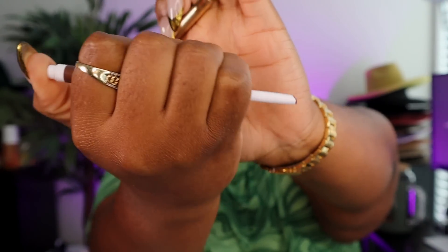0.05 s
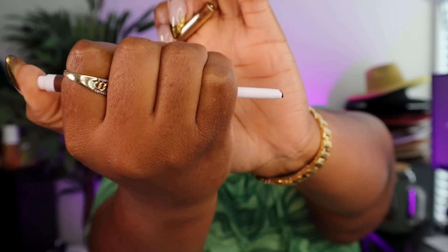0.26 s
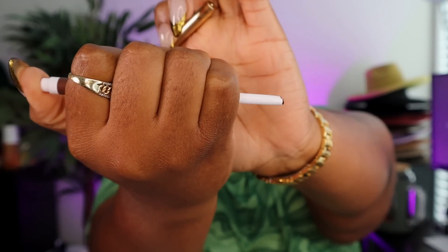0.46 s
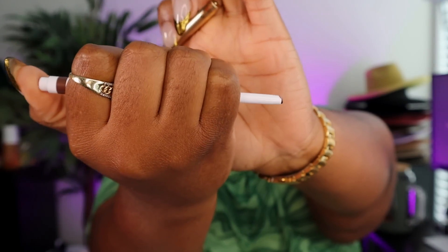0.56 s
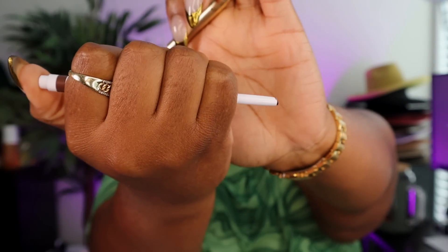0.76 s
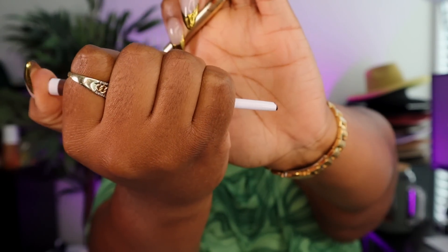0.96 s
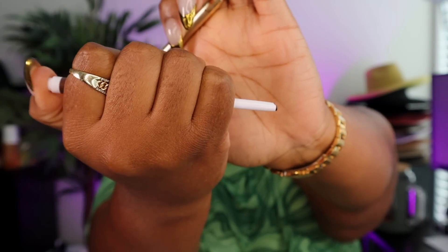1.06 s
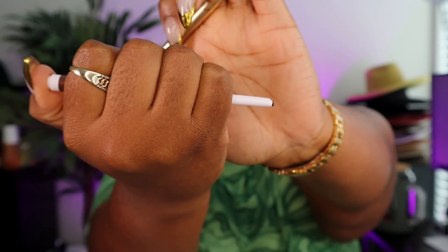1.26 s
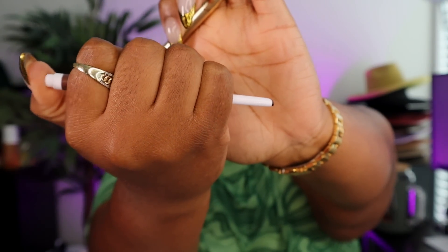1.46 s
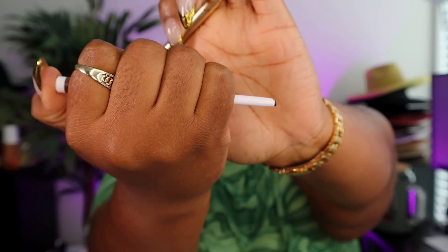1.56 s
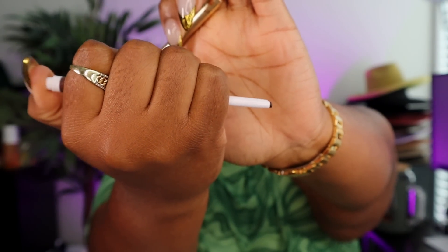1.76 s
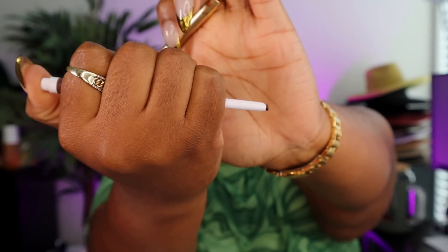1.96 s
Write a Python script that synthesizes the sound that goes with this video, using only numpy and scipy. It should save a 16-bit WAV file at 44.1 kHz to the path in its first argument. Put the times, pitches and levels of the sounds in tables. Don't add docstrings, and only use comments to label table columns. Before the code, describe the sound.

A plastic click-action cosmetic pencil is clicked four times quickly, close up in a quiet room.

```python
import sys
import numpy as np
from scipy import signal
from scipy.fft import rfft, irfft
from scipy.io import wavfile

SR = 44100
rng = np.random.default_rng(int(sys.argv[2]) if len(sys.argv) > 2 else 0)


def gain_from_db(level_db):
    decades = np.asarray(level_db, float) / 20
    return 10 ** decades


def digitize_waveform(pressure):
    field = np.atleast_2d(pressure).T
    bounded = np.clip(field, -1, 1)
    quanta = np.round(bounded * 32767).astype(np.int16)
    wavfile.write(sys.argv[1], SR, quanta)


N = 88596


def evened(x):
    return x / np.sqrt(np.mean(x ** 2) + 1e-20)


def read(points, hz):
    f, value = np.transpose(points)
    return np.interp(np.log(hz + 1), np.log(f + 1), value)


def band(x, low_hz, top_hz, order=2):
    sos = signal.butter(order, [low_hz, min(top_hz, 20000)], "band", fs=SR, output="sos")
    return signal.sosfilt(sos, x)


def left_right(left, right):
    return np.array([[left], [right]])


def add(mix, s, sound):
    part = mix[:, round(s * SR):][:, :sound.shape[1]]
    part += sound[:, :part.shape[1]]


# (frequency [Hz], density [dB per Hz])
AIR_MID = [(30, -12.5), (90, -9.5), (210, -5.5), (350, -10.5), (5000, -27), (8300, -38.5), (11000, -39),
           (13500, -38.5)]
AIR_SIDE = [(40, -26), (155, -4), (450, -5.5), (1350, -10), (2500, -9.5), (5500, -13.5), (10000, -27.5),
            (15000, -30)]
MID_DB, SIDE_DB, AIR_PAN_DB = -50, -47.5, -2.5
PORT_HZ, PORT_WIDTH_HZ, PORT_MID_DB, PORT_SIDE_DB = 2650, 950, 7, 3


def air():
    hz = np.fft.rfftfreq(N, 1 / SR)
    port = 1 / (1 + ((hz - PORT_HZ) / PORT_WIDTH_HZ * 2) ** 2)
    z = rfft(rng.standard_normal((2, N)))
    mid_gain = gain_from_db(read(AIR_MID, hz) + PORT_MID_DB * port)
    side_gain = gain_from_db(read(AIR_SIDE, hz) + PORT_SIDE_DB * port)
    mid = gain_from_db(MID_DB) * evened(irfft(z[0] * mid_gain, N))
    side = gain_from_db(SIDE_DB) * evened(irfft(z[1] * side_gain, N))
    return np.array([mid + side, mid - side]) * gain_from_db(left_right(AIR_PAN_DB / 2, -AIR_PAN_DB / 2))


# (frequency [Hz], width [Hz], level [dB])
HUM = [(37.23, 1.8, -64), (60.26, 1.8, -57), (111.9, 1.3, -60.5), (215.4, 23.6, -59), (311.7, 5, -65)]


def hum():
    hz = np.fft.rfftfreq(N, 1 / SR)
    out = np.zeros(N)
    for (f, width_hz, db), noise in zip(HUM, rng.standard_normal((len(HUM), N))):
        line = irfft(rfft(noise) * np.exp(-((hz - f) / width_hz) ** 2), N)
        out = out + gain_from_db(db) * evened(line)
    return out


# (time [s], length [s], level [dB])
RUSTLES = [
    (0.296, 0.026, -67),
    (0.798, 0.039, -67),
]


def rustle():
    t = np.arange(N) / SR
    noise = evened(band(rng.standard_normal((2, N)), 7000, 17000))
    swells = sum(gain_from_db(db) * np.exp(-((t - s) / length_s) ** 2) for s, length_s, db in RUSTLES)
    return noise * swells


RING_N = 1500
DETUNE = .012


def ring(modes):
    t = np.arange(RING_N) / SR
    out = 0
    draws = rng.uniform(-1, 1, (len(modes), 2))
    for (hz, left_db, right_db, t60), (tune, phase) in zip(modes, draws):
        level = gain_from_db(left_right(left_db, right_db) - 60 * t / t60)
        out = out + level * np.sin(2 * np.pi * hz * (1 + DETUNE * tune) * t + left_right(0, phase))
    return out


SECOND_S, RIGHT_LAG_S = .00055, .00005
CHATTER_S, CHATTER_DB, CHATTER_N = .0012, -9, 400


def strikes_and_chatter(second_db):
    n = np.arange(CHATTER_N)
    hits = rng.standard_normal(CHATTER_N) * (rng.random(CHATTER_N) < .3)
    chatter = gain_from_db(CHATTER_DB) * np.exp(-n / SR / CHATTER_S) * hits
    lag = left_right(0, RIGHT_LAG_S * SR)
    right = np.interp(n - lag[1], n, chatter) * rng.uniform(0.1, 2.46, CHATTER_N)
    gap = SECOND_S * SR * rng.uniform(.88, 1.12)
    strikes = np.sinc(n - 2 - lag) - gain_from_db(second_db) * np.sinc(n - 2 - lag - gap)
    return strikes, np.array([chatter, right])


# (frequency [Hz], left [dB], right [dB], t60 [s])
SHELL = [(4100, -12, -15, .006), (5700, -12, -17, .005), (6500, -20, -19, .007), (7600, -13, -14, .004),
         (8900, -14, -15, .004), (13900, -13, -15, .003)]
# (pitch ratio, left [dB], right [dB], t60 [s])
CAP = [(.93, -6, -5, .0035), (1, -4, -1, .005), (1.08, -3, -5, .0035)]
# (frequency [Hz], left [dB], right [dB], t60 [s])
LOW = [(1480, -9, -1, .013), (2000, -14, -8, .008)]
TICK_DB, TICK_LOW_HZ, TICK_TOP_HZ = -3, 2800, 15000
BODY_LOW_HZ, THUD_HZ, SWELL_S = 1150, 800, .0004


def snap(barrel_db, cap_db, low_db, cap_hz, barrel, shell_db, second_db, thud_db):
    strikes, chatter = strikes_and_chatter(second_db)
    swell = 1 - np.exp(-np.arange(RING_N) / SR / SWELL_S)
    point = np.eye(2, RING_N)[[0, 0]]
    cap = [(cap_hz * ratio, *rest) for ratio, *rest in CAP]
    struck = [(shell_db, ring(SHELL)),
              (shell_db + TICK_DB, band(point, TICK_LOW_HZ, TICK_TOP_HZ)),
              (cap_db, ring(cap))]
    parts = []
    for db, body in struck:
        hit = signal.fftconvolve(strikes + chatter, body, axes=1)
        parts.append((db, band(hit, BODY_LOW_HZ, SR)))
    for db, modes in [(barrel_db, barrel), (low_db, LOW)]:
        parts.append((db, band(swell * ring(modes), BODY_LOW_HZ, SR)))
    thud = band(point, THUD_HZ / 2, THUD_HZ * 2)
    parts.append((thud_db, signal.fftconvolve(strikes, thud, axes=1)))
    return sum(gain_from_db(db) * x[:, :RING_N] / np.linalg.norm(x) for db, x in parts)


# (time [s], level [dB])
SLIPS = [(0.983, -35), (1.126, -23.5), (1.13, -17.5), (1.1527, -19), (1.3178, -14), (1.3205, -22),
         (1.442, -25), (1.4488, -14.5), (1.4671, -27), (1.698, -16), (1.9516, -9), (1.959, -23),
         (1.9709, -22)]
# (time [s], barrel ring [dB], cap ring [dB], low ring [dB], cap pitch [Hz])
PRESSES = [
    (1, 2.5, 0, -18, 11100),
    (1.3268, 0, 5, -16.5, 10660),
    (1.589, 2, 4.5, -12.5, 10700),
    (1.8413, 2.5, 0.5, -5.5, 11100),
]
RELEASES = [
    (1.1585, 0.97, 9, -9, 10350),
    (1.4707, 2.3, 7.5, -9.5, 10780),
    (1.7241, 0.9, 9, -13, 10650),
    (1.9754, 0.65, 12, -12.5, 10140),
]
# (frequency [Hz], left [dB], right [dB], t60 [s])
PRESS_BARREL = [(2550, -31, 8.5, 0.012), (2833, -0.5, 7, 0.017), (3120, -2, -2.5, 0.015)]
RELEASE_BARREL = [(2180, -3.5, 9.5, 0.0052), (2648, 0, 7.5, 0.01), (3470, 2.5, 0.5, 0.0036)]
PRESS_SHELL_DB, PRESS_SECOND_DB, PRESS_THUD_DB = 0, -1, -20
RELEASE_SHELL_DB, RELEASE_SECOND_DB, RELEASE_THUD_DB = -0.5, 1, -13


def pencil():
    out = np.zeros((2, N))
    for s, db in SLIPS:
        slip = snap(0, -11, -13, 10500, PRESS_BARREL, shell_db=-11.5, second_db=-11, thud_db=-45)
        add(out, s, gain_from_db(db) * slip)
    for s, *row in PRESSES:
        add(out, s, snap(*row, PRESS_BARREL, row[0] + PRESS_SHELL_DB, PRESS_SECOND_DB, PRESS_THUD_DB))
    for s, *row in RELEASES:
        shell_db = row[0] + RELEASE_SHELL_DB
        add(out, s, snap(*row, RELEASE_BARREL, shell_db, RELEASE_SECOND_DB, RELEASE_THUD_DB))
    return out


# (delay [s], left [dB], right [dB])
ECHOES = [(.0102, -24, -22), (.0148, -24, -25), (.0045, -22, -24), (.021, -29, -29)]
# (frequency [Hz], t60 [s])
ROOM = [(500, 0.25), (1500, 0.4), (3000, 0.23), (6000, 0.29), (10000, 0.13), (15000, 0.26)]
# (frequency [Hz], level [dB])
WALLS = [(1000, 3.5), (2700, -1.5), (4500, 2), (8000, 3), (12000, -3.5), (15000, -3)]
ROOM_DB, ROOM_START_S = -9.5, .0035
TAIL_N, TAP_GAP = SR // 2, 20


def room(x):
    taps = np.zeros((2, TAIL_N))
    at = np.arange(round(ROOM_START_S * SR), TAIL_N - TAP_GAP, TAP_GAP)
    at = at + rng.integers(0, TAP_GAP, (2, len(at)))
    np.put_along_axis(taps, at, rng.choice([-1., 1.], at.shape), 1)
    hz, t, z = signal.stft(taps, SR, nperseg=128)
    decay_db = read(WALLS, hz)[:, None] - 60 * t / read(ROOM, hz)[:, None]
    tail = signal.istft(z * gain_from_db(decay_db), SR, nperseg=128)[1]
    tail = gain_from_db(ROOM_DB) * tail / np.sqrt(at.shape[1] / 20)
    for s, left_db, right_db in ECHOES:
        add(tail, s, gain_from_db(left_right(left_db, right_db)))
    return signal.fftconvolve(x, tail, axes=1)[:, :N]


# (frequency [Hz], level [dB])
MIC = [(11500, 0), (13000, -6), (15000, -12), (16300, -24), (17000, -55)]


def scene():
    near = pencil()
    mix = near + room(near) + air() + hum() + rustle()
    return irfft(rfft(mix) * gain_from_db(read(MIC, np.fft.rfftfreq(N, 1 / SR))), N)


def top_cut(x):
    return signal.sosfilt(signal.butter(12, 17080, fs=SR, output="sos"), x)


def record(dry):
    lowpass = signal.firwin(511, 17000, window=("kaiser", 9), fs=SR)
    cut = signal.oaconvolve(dry, lowpass[None], "same")
    return top_cut(cut)


dry = scene()
out = record(dry)
digitize_waveform(out)
```